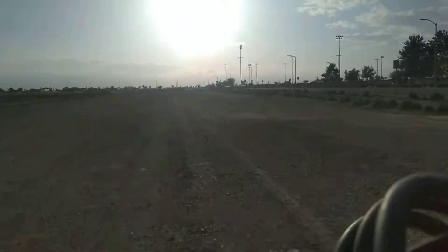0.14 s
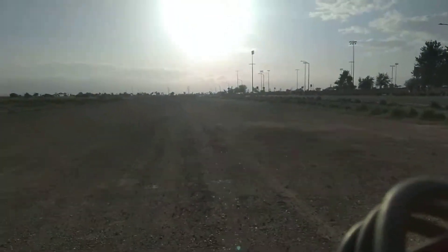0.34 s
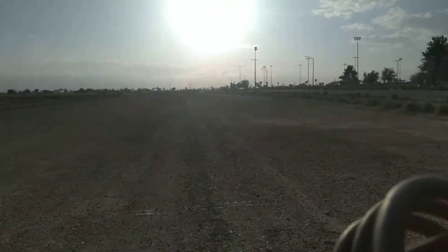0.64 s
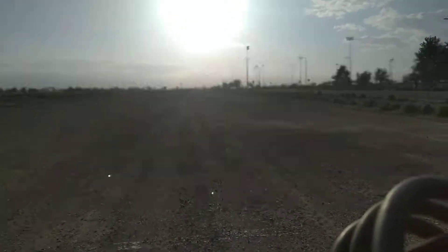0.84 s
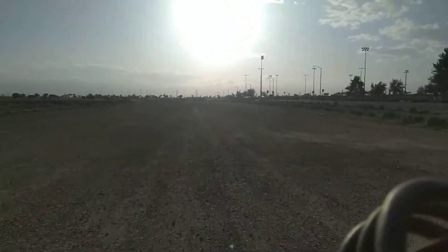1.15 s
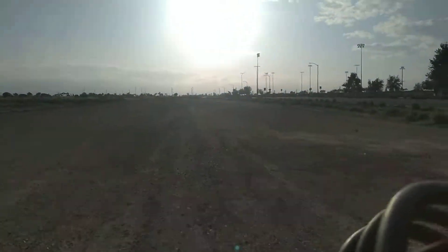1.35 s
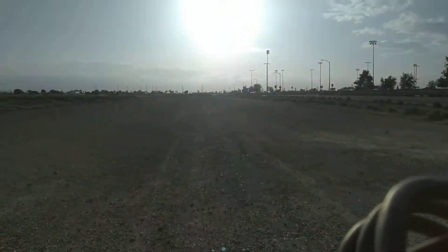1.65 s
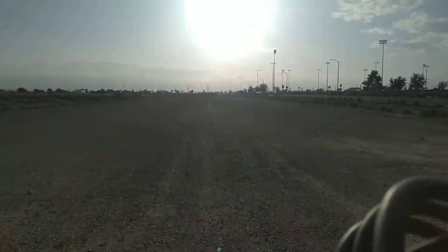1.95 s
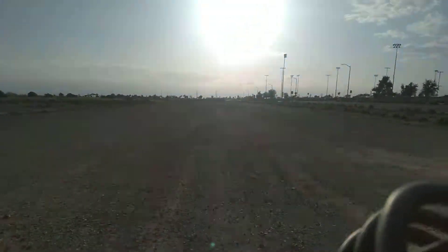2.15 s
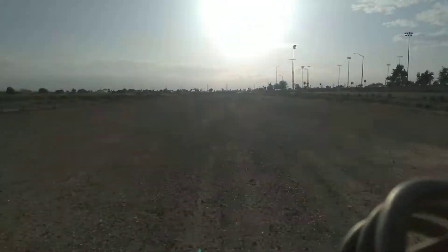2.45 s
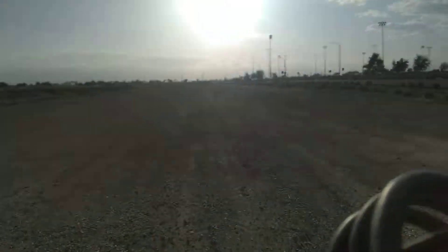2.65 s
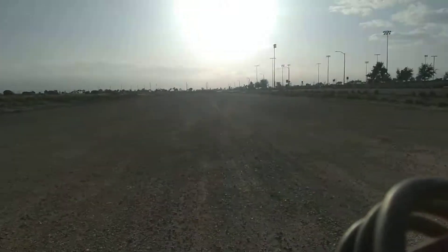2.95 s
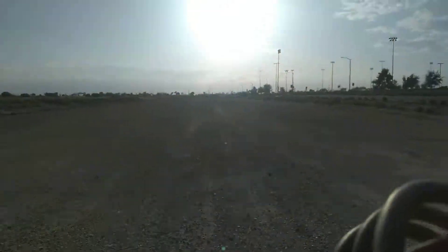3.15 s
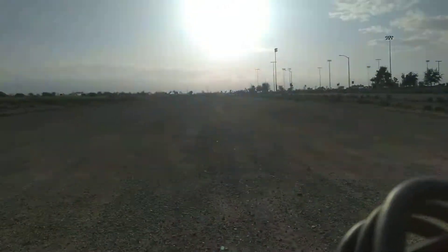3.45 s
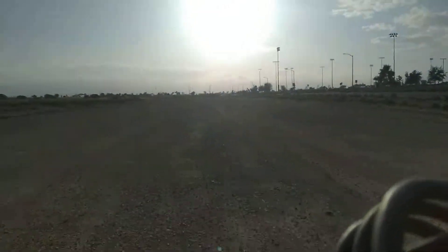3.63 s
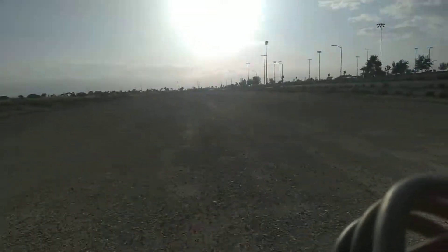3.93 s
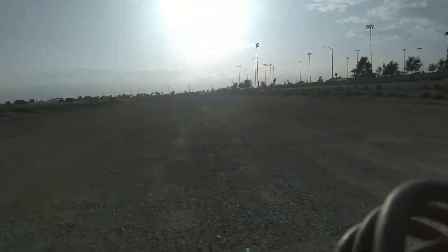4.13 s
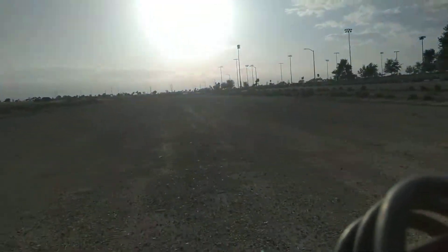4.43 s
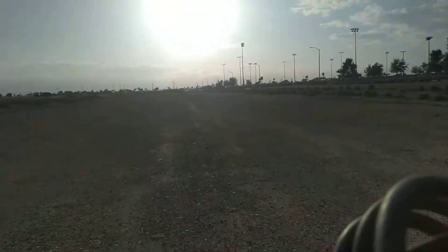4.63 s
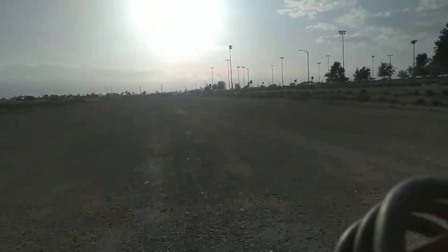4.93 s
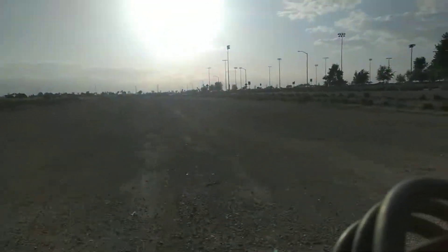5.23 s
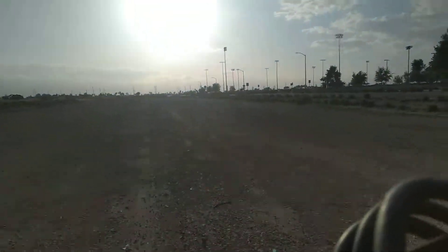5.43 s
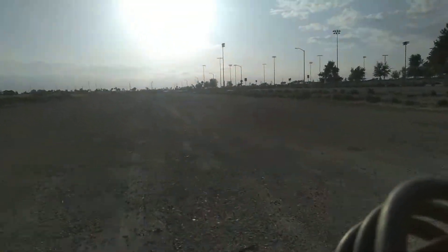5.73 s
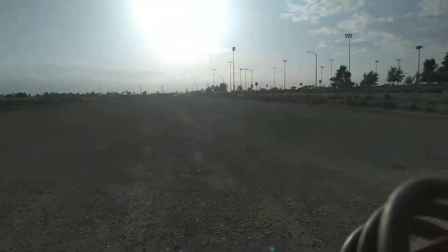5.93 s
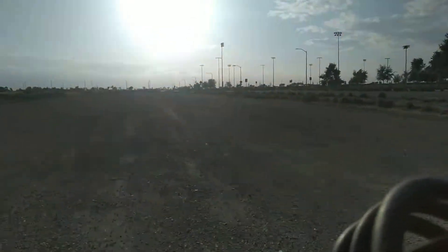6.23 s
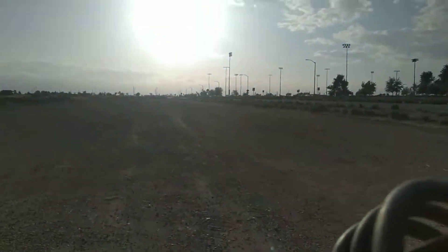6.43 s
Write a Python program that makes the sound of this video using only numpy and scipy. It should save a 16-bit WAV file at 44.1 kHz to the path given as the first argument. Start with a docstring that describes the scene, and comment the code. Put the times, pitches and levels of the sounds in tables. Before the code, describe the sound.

A small vehicle's tyres roll slowly across loose gravel on an open dirt lot. A low, uneven rumble and grainy crunch run continuously, with fine gritty fizz, pebble clatter, dull knocks and sharp snaps of pinched stones. After about five seconds the rumble drops away, leaving lighter crackles and scattered ticks. The stereo microphone rides close on the frame; there is no echo.

```python
"""Tyres of a small vehicle roll slowly over a bare lot of loose gravel, easing off at the end.
A stereo microphone rides on the frame: noise from random stone contacts is coloured into rumble, crunch and grit.
Pinched stones snap out as ragged bursts and set frame modes ringing; pebbles, drops and crushed piles are
short decaying sines. Clods crumble as quick swells of crackle, and one stone squeaks.
The lot is in open air, with no echo."""
import sys
import numpy as np
from scipy import signal
from scipy.fft import rfft, irfft, next_fast_len
from scipy.io import wavfile
from scipy.ndimage import map_coordinates

SR = 44100
rng = np.random.default_rng(int(sys.argv[2]) if len(sys.argv) > 2 else 0)


def digitize_waveform(pressure):
    """Quantize a signal to 16-bit integers and store it at the path in sys.argv[1].

    Rows of a 2-D input are taken as channels; values are limited to [-1, 1].
    """
    field = np.atleast_2d(pressure).T
    bounded = np.clip(field, -1, 1)
    quanta = np.round(bounded * 32767).astype(np.int16)
    wavfile.write(sys.argv[1], SR, quanta)


N = 290178

# Colours of a knock on tyre or frame, a stone's clack and a bright tick: pitch_hz, level_db
KNOCK_COLOUR = [(80, -16), (250, -1), (600, -5), (1100, -5.5), (1600, -22), (3000, -41), (8000, -99)]
CLACK_COLOUR = [(600, -10), (1300, -7), (1850, 3.5), (2500, 8.5), (3200, 13), (4400, -6.5), (8000, -59.5)]
TICK_COLOUR = [(1500, -4), (3500, -11), (4450, 6), (5400, -1), (6600, 1), (7050, 2.5), (7500, -1),
               (8500, -11), (11400, -17.5), (12500, -22.5), (16000, -30)]


def amp(db):
    """Decibels as an amplitude factor."""
    return 10 ** (np.asarray(db) / 20)


def unit(x):
    """x at rms 1."""
    return x / np.sqrt(np.mean(x ** 2) + 1e-20)


def along(points, hz):
    """Read (Hz, value) points at hz, in straight lines on a log frequency axis."""
    point_hz, value = np.transpose(points)
    return np.interp(np.log(hz + 1), np.log(point_hz + 1), value)


def curve(rows):
    """(s, value) rows as one value per sample."""
    s, value = np.transpose(rows)
    return np.interp(np.arange(N) / SR, s, value)


def wobble(rate):
    """A smooth random curve through rate random knots a second."""
    knots = rng.standard_normal(int(N * rate / SR) + 4)
    return map_coordinates(knots, [np.arange(N) * rate / SR])


def swell(s, half_length):
    """A bell-shaped rise and fall around s seconds, 1 at the top and 1/e at half_length either side."""
    return np.exp(-((np.arange(N) / SR - s) / half_length) ** 2)


def add(track, s, sound):
    """Mix a sound in at s seconds."""
    part = track[:, max(round(s * SR), 0):][:, :sound.shape[1]]
    part += sound[:, :part.shape[1]]


def panned(side_db):
    """Left and right gains of unchanged total power."""
    gains = amp(np.outer([1, -1], side_db) / 2)
    return gains / np.sqrt(np.mean(gains ** 2, axis=0))


def port_turn(hz):
    """Half the phase angle between the two microphone ports, from how alike they move."""
    # together in the bass, oppositely near 3 kHz: pitch_hz, likeness (1 together, -1 opposite; clipped there)
    likeness = [(50, 1), (130, 0.76), (520, 0.94), (1000, 0.49), (1400, -0.22), (1850, 0.37), (2400, -0.37),
                (3000, -1.05), (3700, -0.68), (4300, 0.036)]
    return np.arccos(np.clip(along(likeness, hz), -1, 1)) / 2


def heard(pair, colour):
    """Two unrelated drives ring through a causal, minimum-phase colour and reach the left and right ports."""
    # balance of the microphone ports: pitch_hz, left_minus_right_db
    port_balance = [(90, 2.5), (300, 0.5), (1500, 0), (2000, -3), (2600, 1), (3800, 0), (4600, -5.5),
                    (6300, -8), (7400, 1), (8400, 7), (11500, 7), (14000, 5)]
    size = 2 * next_fast_len(pair.shape[1] // 2 + 4096)
    hz = np.fft.rfftfreq(size, 1 / SR)
    # folding the cepstrum onto positive time makes the colour causal
    cepstrum = irfft(np.log(amp(along(colour, hz))))
    cepstrum[1:size // 2] *= 2
    cepstrum[size // 2 + 1:] = 0
    response = np.exp(rfft(cepstrum))
    turn = port_turn(hz)
    mid, side = rfft(pair, size) * response * [np.cos(turn), np.sin(turn)]
    ports = np.array([mid + side, mid - side]) * panned(along(port_balance, hz))
    return irfft(ports, size)[:, :pair.shape[1]]


def contacts(rate, spread_db, size):
    """Impulses at random moments, rate a second on average, their levels spread at random in dB."""
    struck = rng.random(size) < rate / SR
    return struck * amp(spread_db * np.clip(rng.standard_normal(size), -2, 2))


def crackle(rate, spread_db, life, size):
    """Every contact lets off a tiny noise burst that builds quickly and decays with time constant life (s)."""
    rise_s = 0.00045  # each burst builds over about half a millisecond
    power = contacts(rate, spread_db, size) ** 2
    for seconds in (rise_s, life):
        power = signal.lfilter([1], [1, -np.exp(-2 / (seconds * SR))], power)
    return unit(np.sqrt(power) * rng.standard_normal((2, size)))


def stones(s, hz, gain, cycles, size):
    """Stones struck at the moments s, each ringing for a few cycles at its own pitch and place."""
    t = np.arange(SR // 40) / SR
    age = np.outer(hz, t)  # in cycles
    ring = gain[:, None] * np.exp(-age / cycles) * (1 - np.exp(-age / 0.9))
    phases = np.outer(port_turn(hz) * rng.standard_normal(len(s)), [1, -1])
    at = (np.round(s * SR).astype(int)[:, None] + np.arange(len(t))).ravel()
    ports = []
    for phase in phases.T:
        sound = ring * np.sin(2 * np.pi * age + phase[:, None])
        ports.append(np.bincount(at, sound.ravel(), size)[:size])
    return np.array(ports)


def pebbles(count, middle_hz, variety, spread_db, cycles):
    """Stones of all sizes knock together at random moments, each with its own pitch."""
    when, pitch = rng.random(count), rng.standard_normal(count)
    strength = np.clip(rng.standard_normal(count), -2, 2)
    hz = middle_hz * np.exp(variety * np.clip(pitch, -2, 2))
    return unit(stones(when * N / SR, hz, amp(spread_db * strength), cycles, N))


def rolling(bumps):
    """Stones pass under the tread: soft frame thumps, harder crunches, knocks and clatter, all set by the load."""
    # tyre load shaking the frame, before lulls and trim: time_s, rumble_db
    load_points = [(0, -18), (0.25, -20.5), (1.05, -19.5), (1.8, -21), (2.12, -20.5), (2.35, -22.5),
                   (2.8, -21.5), (3.45, -18.3), (4.1, -21), (4.55, -20), (4.75, -25), (5.27, -25),
                   (5.43, -36), (5.53, -32.5), (5.85, -30.5), (5.97, -28.5), (6.33, -30), (6.56, -39)]
    # a tyre crosses a smooth spot and the rumble sags: middle_s, depth_db
    smooth_spots = [(0.05, 4.5), (0.301, 3), (1.205, 4.5), (1.687, 3.5), (1.875, 0.5), (2.305, 4.5),
                    (2.419, 7), (2.555, 5), (2.918, 4), (4.361, 6), (4.705, 4), (5.69, 3.5), (5.86, 4)]
    # a tyre ploughs through a heap of coarse stones: deepest_s, crunch_db, half_length_s
    stone_heaps = [(0.72, -24.5, 0.064), (0.92, -21.5, 0.024), (1.124, -18.5, 0.026), (1.493, -21.5, 0.12),
                   (2.078, -16.5, 0.026), (2.86, -20.5, 0.053), (3.009, -25, 0.032), (4.492, -22, 0.024),
                   (4.597, -23, 0.055), (5.51, -28, 0.022)]
    # colours of the shaken frame and of grinding coarse stones: pitch_hz, level_db
    frame_colour = [(20, -56), (40, -40), (62, -20.5), (85, -7.5), (125, 1.5), (200, 0.5), (320, -4),
                    (480, -11), (750, -24.5), (1500, -41.5), (3000, -101)]
    crunch_colour = [(120, -33), (300, 7), (500, 4.5), (720, 1.5), (1000, -7), (1450, -19.5), (1900, -21.5),
                     (2800, -35), (4000, -58), (9000, -84)]
    lull_s = .027  # half-width of a smooth spot's dip
    full_load_db, full_crunch_db = -18.5, -26.5  # rumble at full load, and the crunch bed there
    crunch_grows = 1.33  # crunch dB per rumble dB

    load_db = curve(load_points) - sum(depth * swell(s, lull_s) for s, depth in smooth_spots)
    pace = amp((load_db - load_db.max()) * .4)  # a slower tyre meets fewer stones
    thumps = contacts(2000 * pace, spread_db=3.5, size=N) * rng.standard_normal((2, N)) / np.sqrt(pace)
    grinds = contacts(1500 * pace, spread_db=1.5, size=N) * rng.standard_normal((2, N)) / np.sqrt(pace)

    rumble_gain = amp(load_db + 0.55 + 0.61 * wobble(16))
    rumble = rumble_gain * unit(heard(thumps * amp(1.65 * bumps), frame_colour))

    # coarse stones grind harder the more the tyres are loaded
    bed = amp(full_crunch_db + crunch_grows * (load_db - full_load_db) + 0.66 * wobble(11))
    heaps = sum(amp(db) * swell(s, half_length) for s, db, half_length in stone_heaps)
    crunch = np.hypot(bed, heaps) * unit(heard(grinds * amp(2.55 * bumps), crunch_colour))

    # the odd stone knocks on the tyre
    knock_bursts = crackle(40, spread_db=2.0, life=0.0062, size=N)
    knocks = amp(load_db - 19.5) * unit(heard(knock_bursts, KNOCK_COLOUR))

    # pebbles clatter under the load and in the heaps
    clatter_gain = amp(-20.5 + 1.9 * bumps) * np.hypot(amp(load_db), heaps)
    clatter = clatter_gain * pebbles(count=1500, middle_hz=1050, variety=0.364, spread_db=5.5, cycles=2.05)
    return rumble + crunch + knocks + clatter


def drops():
    """A tyre drops off a larger stone: one push sets the frame swinging for a few cycles."""
    # drops off larger stones, level before 10 dB of gain, envelope and high-pass: start_s, level_db, swing_hz
    stone_drops = [(.241, -13.5, 495), (.26, -12, 180), (0.456, -13, 600), (.767, -12.5, 425),
                   (1.553, -14, 606), (2.047, -12, 766), (2.098, -15, 211), (2.21, -9.5, 433),
                   (2.491, -13, 227), (2.626, -21, 181), (2.742, -5, 660), (2.805, -11.5, 620),
                   (3.074, -12.5, 168), (3.468, -9.5, 256), (3.536, -13, 685), (3.631, -8, 620),
                   (4.003, -11, 613), (4.028, -10, 316), (4.286, -11, 497), (4.427, -12, 475),
                   (4.61, -13.5, 636), (4.817, -22, 133), (5.03, -19, 192), (5.518, -19, 225),
                   (5.64, -25, 175), (5.731, -18, 520), (5.996, -19.5, 230), (6.095, -18, 474),
                   (6.133, -17.5, 244)]
    out, t = np.zeros((2, N)), np.arange(SR // 20) / SR
    for s, db, hz in stone_drops:
        swing = np.sin(2 * np.pi * hz * t) * np.exp(-hz * t / 1.11) * (1 - np.exp(-t / 0.0022))
        add(out, s, amp(db + 10.0) * np.tile(swing, (2, 1)))
    # the frame hardly swings below 110 Hz
    return signal.sosfilt(signal.butter(2, 110, "high", fs=SR, output="sos"), out)


def crushes(count):
    """A slow tyre crushes a pile of stones: a dense burst of contacts that fades and sinks in pitch."""
    # crushed piles, length being the fade's time constant: start_s, level_db, length_s, first_stones_hz
    piles = [(0.91, -28, .014, 1280), (1.566, -20.5, .018, 1710), (2.052, -26.5, .022, 2100),
             (2.491, -28, .008, 1390), (3.628, -26, .007, 1390), (5.478, -27.5, .022, 1180),
             (5.723, -27.5, 0.023, 714), (6.24, -27, 0.019, 473)]
    end_hz, sink_s = 414, 0.02  # the crunch moves towards this pitch as the tread covers the pile
    out = np.zeros((2, N))
    for s, db, length, hz in piles:
        age = (np.arange(count) + rng.random(count)) / count * length * 3.0
        middle_hz = end_hz + (hz - end_hz) * np.exp(-age / sink_s)
        pitch = middle_hz * np.exp(0.23 * rng.standard_normal(count))
        gain = np.exp(-age / length) * amp(3.6 * rng.standard_normal(count))
        burst = stones(age, pitch, gain, cycles=2.1, size=SR // 6)
        add(out, s - .001, amp(db) * burst / np.sqrt(np.sum(burst ** 2) / (SR * length)))
    return out


def grit(bumps):
    """Fine stones shift under the tread: a dense fizz of sand with small stones ticking and chinking in it."""
    # grit level that the layer gains below refer to: time_s, grit_db
    grit_points = [(0, -45), (1.4, -46.5), (1.75, -48), (2.1, -44.5), (2.75, -46), (3.15, -42),
                   (3.85, -42.5), (4.7, -45.5), (5.1, -42), (5.38, -49.5), (5.86, -47.5), (6.05, -43.5),
                   (6.58, -47.5)]
    # colour of shifting sand: pitch_hz, level_db
    sand_colour = [(600, -14.5), (1400, 6.5), (2550, 2.5), (2950, -17), (3700, -12.5), (4100, 5), (4500, 4),
                   (5600, -0.5), (6900, 0.5), (7800, -1), (8300, -16.5), (11400, -17), (12300, -19),
                   (16000, -57)]
    grit_db = curve(grit_points)
    clumps = amp(2.2 * bumps + 2.18 * wobble(60))  # sand gives way in clumps
    fizz = unit(heard(crackle(1000, spread_db=-1.5, life=0.0063, size=N) * clumps, sand_colour))
    ticks = unit(heard(crackle(35, spread_db=6.0, life=0.0012, size=N), TICK_COLOUR))
    clacks = unit(heard(crackle(90, spread_db=1.0, life=0.005, size=N) * clumps, CLACK_COLOUR))
    chinks = pebbles(count=480, middle_hz=5520, variety=0.17, spread_db=5.0, cycles=3.5)
    layers = amp(1.0) * fizz + amp(-14.0) * ticks + amp(-3.0) * clacks + amp(-11.0) * chinks
    return amp(grit_db) * layers


def snaps():
    """A pinched stone shoots out: a knock, a clack with the frame's ring and a bright tick, all ragged bursts."""
    # pinched stones, levels before the gains below: time_s, knock_db, clack_db, tick_db, left_minus_right_db
    pinched_stones = [(0.019, -26.5, -28.5, -29.5, 13), (0.076, -25, -42, -38.5, 14.5),
                      (0.107, -27.5, -43, -28, 6), (0.149, -33.5, -27, -34.5, 7),
                      (0.767, -29.5, -42, -38.5, 13), (0.909, -32, -39, -37.5, -13),
                      (0.97, -29, -52, -30, -6), (1.238, -45, -22.5, -24.5, 19),
                      (1.2471, -43, -14.5, -32, 1), (1.274, -44, -31, -38, -5),
                      (1.339, -42.5, -41, -37, 11), (1.909, -23.5, -14.5, -37, 2.5),
                      (2.238, -21, -31, -34, -10), (2.245, -35, -16.5, -30.5, 4.5),
                      (2.372, -23.5, -42, -28, 28), (2.744, -29, -55, -36.5, 15),
                      (2.906, -41, -49, -26, -21), (3.005, -27, -24, -25.5, 4),
                      (3.778, -32, -25.5, -27.5, -8), (3.785, -25, -15.5, -26, 0),
                      (3.84, -38, -28, -41, -3), (3.934, -27.5, -41, -33.5, 8), (4.056, -35, -22, -33, 17),
                      (4.071, -50, -26.5, -48, 20), (4.354, -44, -45, -27.5, -15),
                      (4.378, -46, -59, -31.5, 10), (4.511, -36, -25, -35, -10),
                      (5.072, -39, -35, -37, -11), (5.162, -32, -24, -34, 2.5),
                      (5.226, -24.5, -22.5, -24, 4), (5.277, -30, -36.5, -42, 1),
                      (5.477, -28.5, -36, -26.5, 12), (5.721, -30, -36.5, -37, -6),
                      (5.931, -26, -38, -30.5, -9)]
    # brief ring of the frame when a stone hits it, varied slightly per hit: pitch_hz, level_db, t60_s
    frame_modes = [(1803, -0.5, 0.017), (2447, -0.5, 0.021), (4230, -7, 0.019)]
    lead_s, scatter_s = .004, 0.0166  # small bursts scatter from lead_s before the crack to scatter_s after
    out, t = np.zeros((2, N)), np.arange(SR // 12) / SR
    since = np.maximum(t - lead_s, 0)

    def sized(sound):
        """The sound with the energy of 4 ms at rms 1."""
        return sound / np.sqrt(np.sum(sound ** 2) / (2 * SR * .004))

    def blow(colour, attack, life, small_db):
        """A ragged burst: a faint rise into one crack, with small bursts scattered around it."""
        def burst(age):
            """A quick build and a decay."""
            return np.exp(-age / life) * (1 - np.exp(-age / attack))

        small_start = rng.uniform(0, lead_s + scatter_s, (7, 1))
        small_gain = amp(small_db + 2 * rng.standard_normal((7, 1)))
        small_bursts = np.linalg.norm(small_gain * burst(np.maximum(t - small_start, 0)), axis=0)
        faint_rise = amp(-18) * np.exp(-abs(t - lead_s) / 0.0018)  # falls away again after the crack
        shape = np.hypot(burst(since) + faint_rise, small_bursts)
        return sized(heard(shape * rng.standard_normal((2, len(t))), colour))

    def ring(variety, attack):
        """The frame's modes, a little higher or lower at every hit."""
        age = since * np.exp(variety * rng.standard_normal())
        modes = np.zeros((2, len(t)))
        for hz, db, t60 in frame_modes:
            gain = amp(db + 2 * rng.standard_normal() - 60 * since / t60)
            phase = port_turn(hz) * np.array([[1], [-1]])
            modes += gain * np.sin(2 * np.pi * hz * age + phase)
        return sized(modes * (1 - np.exp(-since / attack)))

    for s, knock_db, clack_db, tick_db, side_db in pinched_stones:
        knock = blow(KNOCK_COLOUR, attack=0.00055, life=0.001, small_db=-22.5)
        clack = blow(CLACK_COLOUR, attack=0.00065, life=0.0024, small_db=-12.5)
        tick = blow(TICK_COLOUR, attack=0.0013, life=0.0014, small_db=-13.5)
        ringing_clack = clack + amp(1.0) * ring(variety=.06, attack=0.00045)
        bright = amp(clack_db - 4.5) * ringing_clack + amp(tick_db + 3.0) * tick
        add(out, s - lead_s, amp(knock_db + 7.0) * knock + panned(side_db) * bright)
    return out


def crumbles():
    """A clod gives way in a quick swell of fine crackles over a duller crunch."""
    # clods breaking up, level before 1 dB of gain, peak a quarter of the length in:
    # start_s, level_db, length_s, left_minus_right_db
    clods = [(0.394, -27, 0.024, -5.5), (1.032, -38, 0.026, -14), (1.263, -36.5, 0.034, 7),
             (1.409, -38.5, 0.04, -4), (1.952, -30, 0.05, 0), (2.259, -39.5, 0.031, 4),
             (2.451, -26.5, 0.019, 3.5), (3.059, -25.5, 0.028, -3), (4.318, -43, 0.052, -21),
             (4.942, -37.5, 0.026, -22), (5.004, -32, 0.04, -7), (5.066, -45, 0.026, -22),
             (5.482, -34.5, 0.067, 5.5), (5.935, -33.5, 0.06, 8), (6.018, -26.5, 0.035, -5),
             (6.105, -33.5, 0.018, 1), (6.441, -31.5, 0.014, 4)]
    out, t = np.zeros((2, N)), np.arange(SR // 6) / SR
    for s, db, length, side_db in clods:
        age = t / (length * 0.25)
        spray = unit(heard(crackle(690, spread_db=5.0, life=0.0039, size=len(t)), TICK_COLOUR))
        core = unit(heard(crackle(600, spread_db=6.0, life=0.0006, size=len(t)), KNOCK_COLOUR))
        envelope = amp(db + 1.0) * age * np.exp(1 - age)
        add(out, s, envelope * (panned(side_db) * spray + amp(-4.5) * core))
    return out


def squeak():
    """A stone slips against another with one very short, thin sine note."""
    # the slip: middle_s, peak_db, half_length_s, pitch_hz
    slip = (.406, -30, .006, 7050)
    s, db, half_length, hz = slip
    return amp(db) * swell(s, half_length) * np.sin(2 * np.pi * hz * np.arange(N) / SR)


def scene():
    """All sounds come from the tyres; uneven ground loads rumble, crunch and grit alike."""
    bumps = unit(np.tanh(wobble(45)))
    return rolling(bumps) + drops() + crushes(count=36) + grit(bumps) + snaps() + crumbles() + squeak()


def record(dry):
    """The microphone on the frame keeps nothing above its band limit."""
    top_hz = 15800
    size = next_fast_len(N + SR // 2)
    kept = np.fft.rfftfreq(size, 1 / SR) < top_hz
    return irfft(rfft(dry, size) * kept, size)[:, :N]


dry = scene()
out = record(dry)
digitize_waveform(out)
```